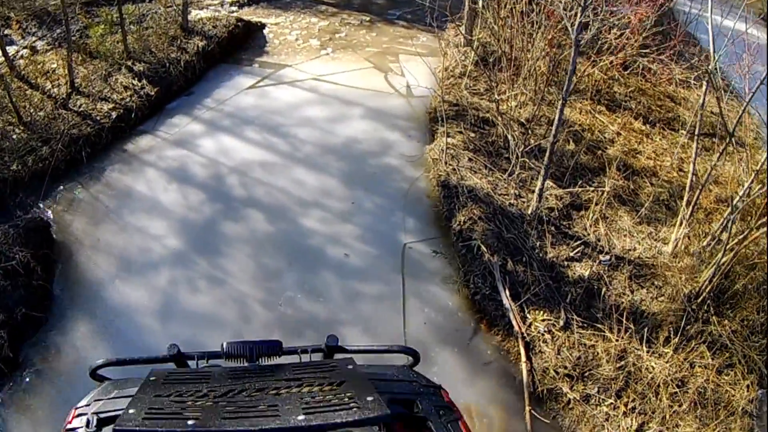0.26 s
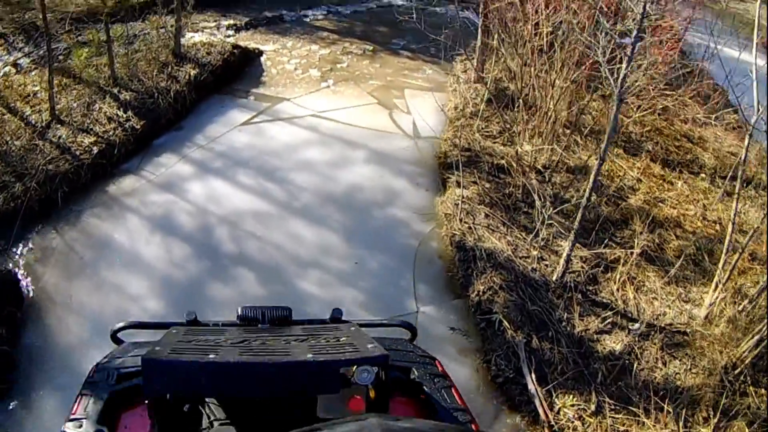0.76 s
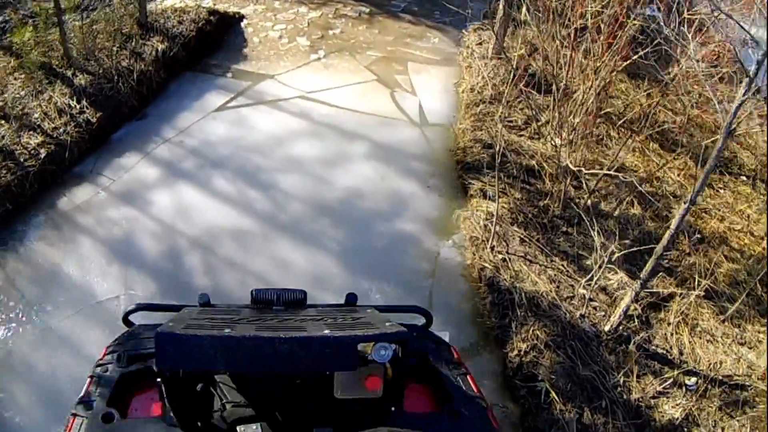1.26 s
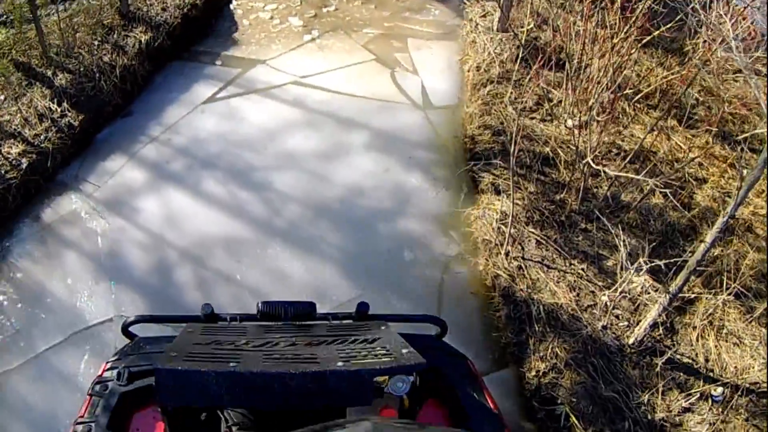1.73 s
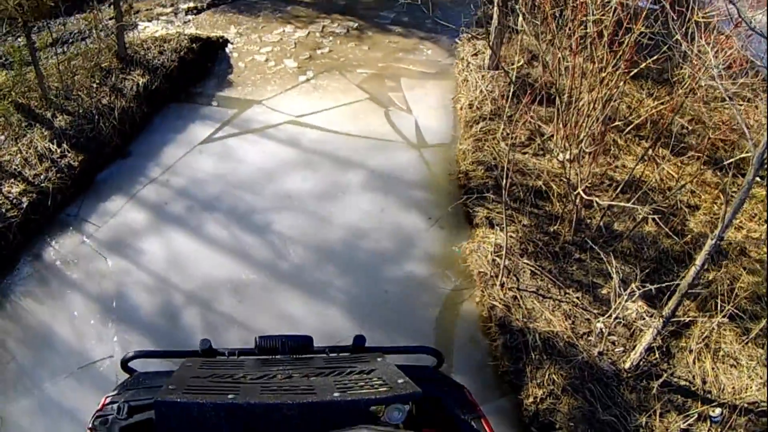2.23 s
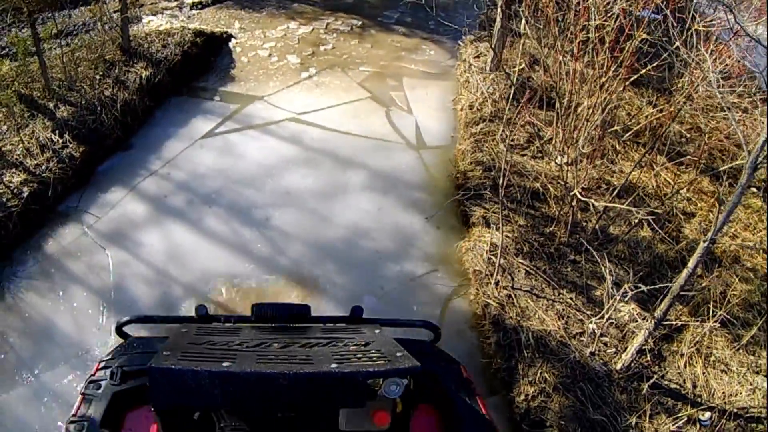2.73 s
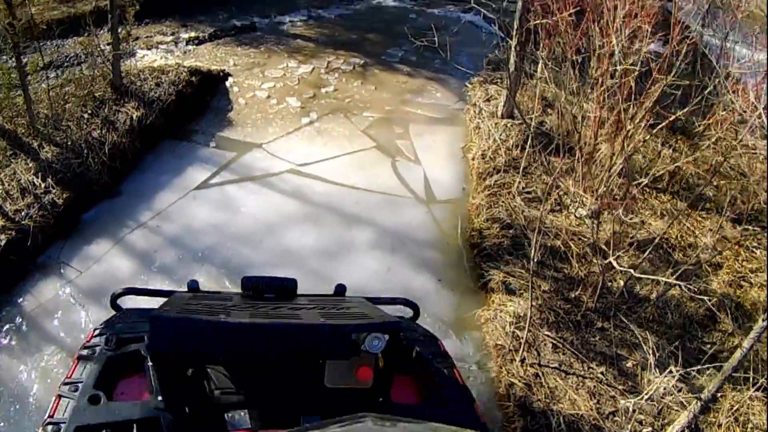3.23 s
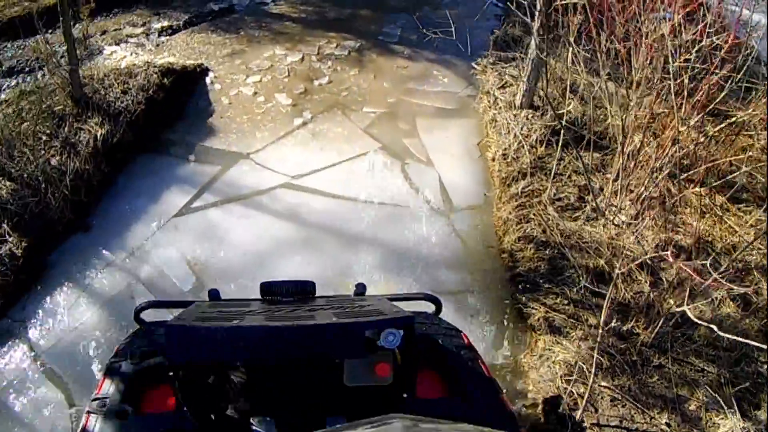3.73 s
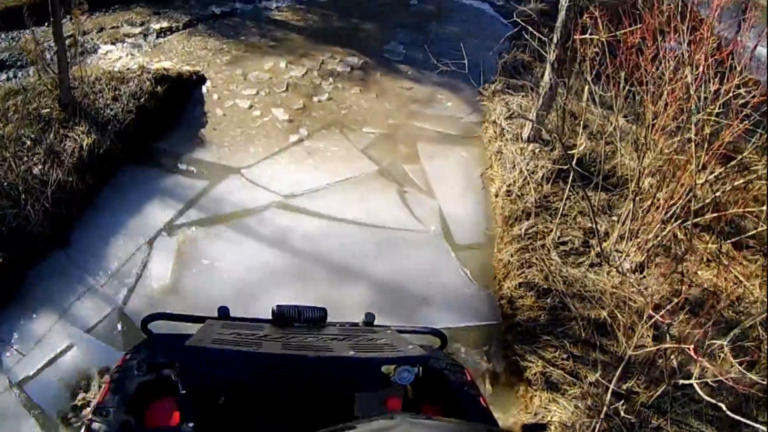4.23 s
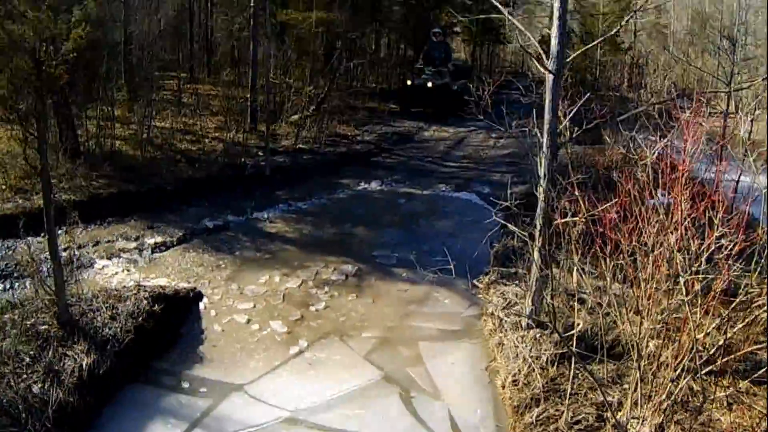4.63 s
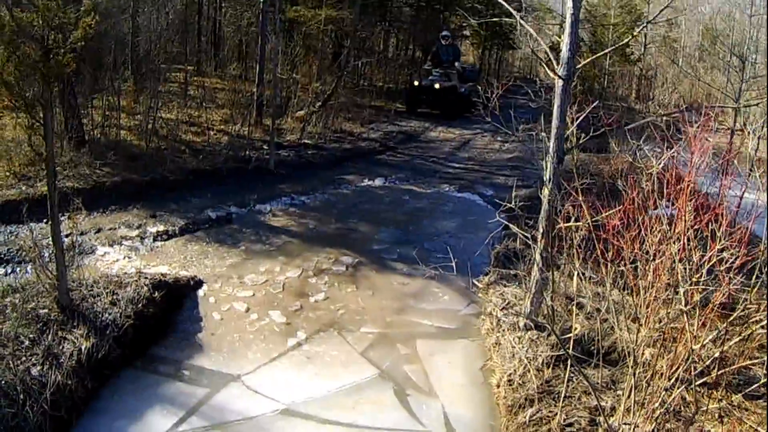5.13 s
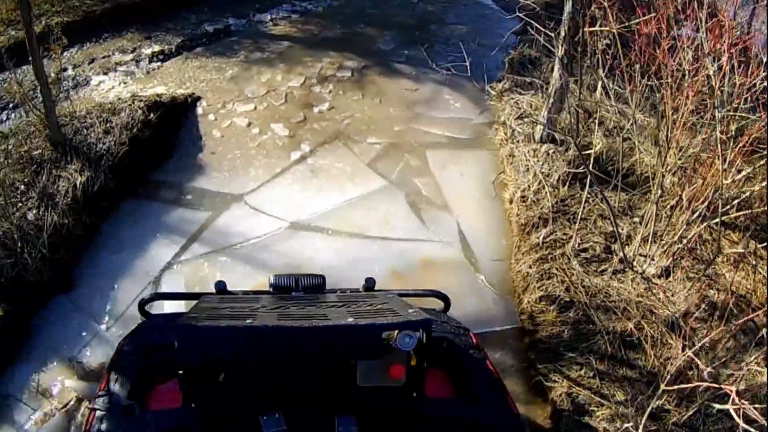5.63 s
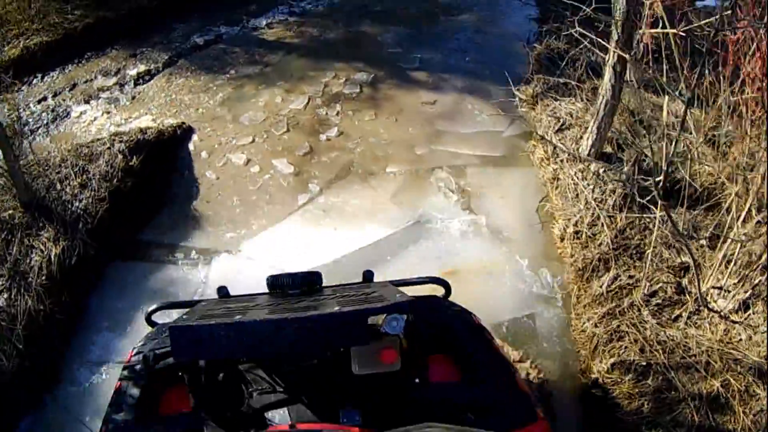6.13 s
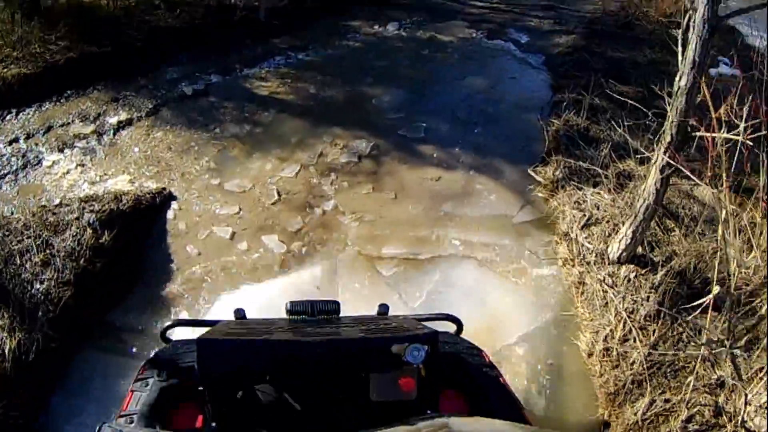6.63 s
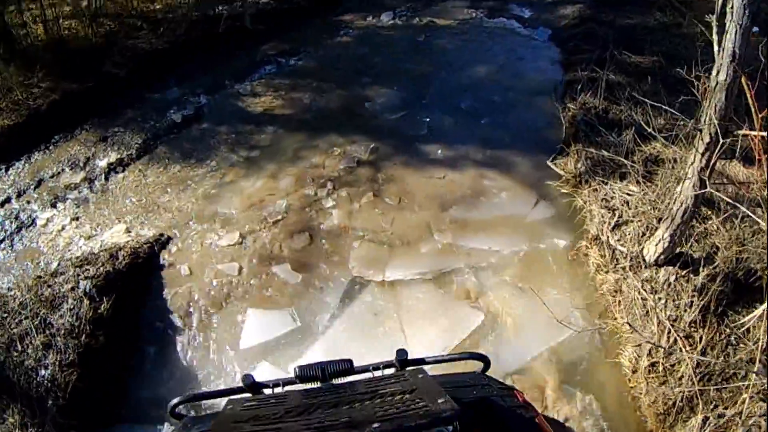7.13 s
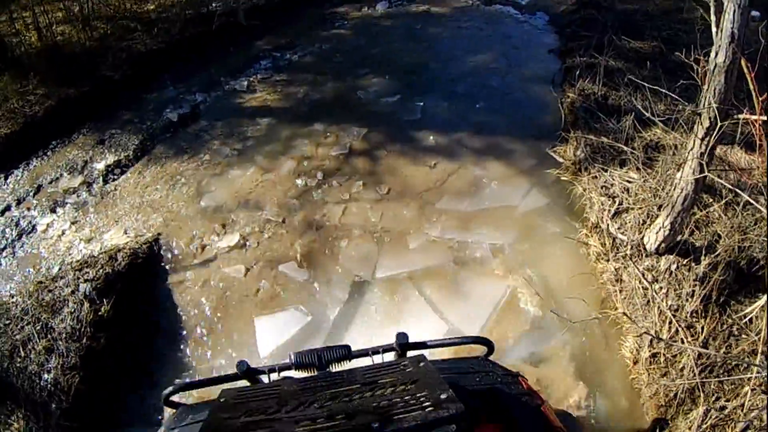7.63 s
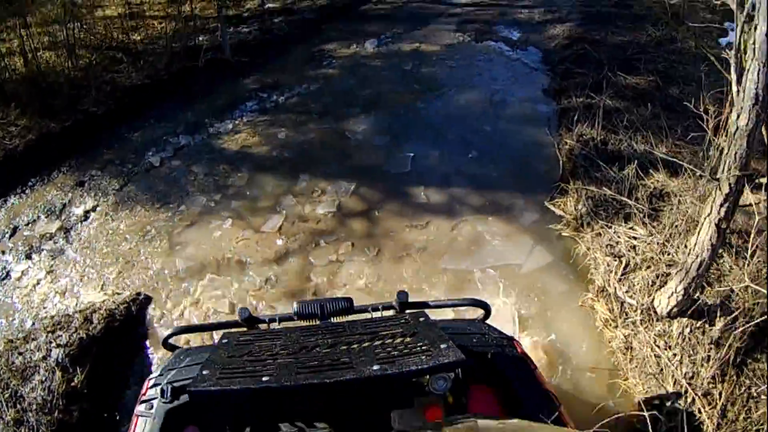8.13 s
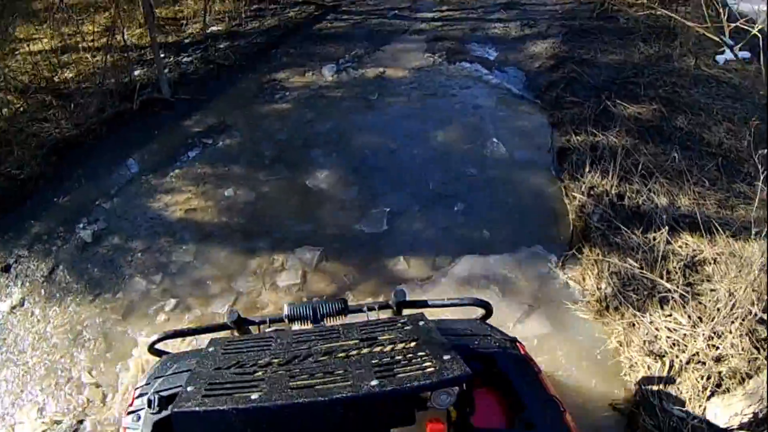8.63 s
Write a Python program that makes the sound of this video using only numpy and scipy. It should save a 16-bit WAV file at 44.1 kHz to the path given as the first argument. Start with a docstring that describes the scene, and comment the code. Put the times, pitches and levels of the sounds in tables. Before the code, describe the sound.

Muffled, close throttle surges from an all-terrain vehicle alternate with chugging idle, while its wheels slosh through water and break plates of ice.

```python
"""All-terrain vehicle on a flooded, frozen trail

A V-twin engine is heard from the rider's seat. Its firing and intake pulses excite resonators: with each
push of the throttle the exhaust drones and the airbox booms; between pushes it sinks to a lumpy idle.
The wheels churn water into spray and ringing bubbles, and break plates of ice. A closed camera housing
muffles all this above about 3 kHz; a faint hiss, thin squeaks and a slight tinkle lie on top."""
import sys
import numpy as np
from scipy import signal
from scipy.fft import rfft, irfft, next_fast_len
from scipy.io import wavfile
from scipy.ndimage import uniform_filter1d

SR = 44100
rng = np.random.default_rng(int(sys.argv[2]) if len(sys.argv) > 2 else 0)


def generate_wav(signal):
    """Clip the signal to [-1, 1] and save it as 16-bit WAV at the path in sys.argv[1]."""
    frames = np.transpose(np.atleast_2d(signal))
    scaled = np.clip(frames, -1, 1) * 32767
    pcm = np.round(scaled).astype(np.int16)
    wavfile.write(sys.argv[1], SR, pcm)


N = 391166
TIME = np.arange(N) / SR
IDLE_HZ = 11.82  # engine speed in cycles per second; one cycle is two turns of the crank
V_GAP = .385  # share of a cycle between the two cylinders' firings


def amp(db):
    """Decibels to amplitude ratio."""
    return 10 ** (np.asarray(db) / 20)

def unit(x):
    """Normalisation to rms 1."""
    return x / np.sqrt(np.mean(x ** 2) + 1e-20)

def steady(x, size=4200):
    """Normalisation by the running rms, which keeps the beat within each engine cycle."""
    return x / np.sqrt(abs(uniform_filter1d(uniform_filter1d(x ** 2, size), size)) + 1e-12)

def bell(value, centre, width):
    """Gaussian window: 1 at the centre, 1/e one width away."""
    return np.exp(-((value - centre) / width) ** 2)

def curve(points):
    """Linear interpolation of (time_s, value) points."""
    return np.interp(TIME, *np.transpose(points))

def wander(hz, step=16):
    """Random fluctuation: low-pass noise of rms 1."""
    n = next_fast_len(N // step + 2, True)
    f = np.fft.rfftfreq(n, step / SR)
    slow = irfft(rfft(rng.standard_normal(n)) * bell(f, 0, hz), n)
    return unit(np.interp(np.arange(N) / step, np.arange(n), slow))

def colour(x, points):
    """Spectral shaping by (frequency_hz, gain_db) points."""
    hz, db = np.transpose(points)
    n = next_fast_len(N, True)
    f = np.fft.rfftfreq(n, 1 / SR)
    return irfft(rfft(x, n) * amp(np.interp(np.log(f + 1), np.log(hz), db)), n)[:N]

def ring(x, modes):
    """Modal superposition: steep parallel resonators of alternating sign."""
    out = np.zeros(len(x))
    for k, (hz, width, db) in enumerate(modes):
        b, a = signal.iirpeak(hz, hz / width, SR)
        out += (-1) ** k * amp(db) * signal.lfilter(b, a, signal.lfilter(b, a, x))
    return out

def bent_ring(x, modes, stretch):
    """Time warping multiplies every modal frequency by the curve stretch."""
    clock = np.cumsum(stretch)
    ticks = np.arange(int(clock[-1]) + 1)
    return np.interp(clock, ticks, ring(np.interp(ticks, clock, x), modes))

def add(mix, start_s, peak_db, sound):
    """Superposition of one event at a given peak level."""
    part = mix[round(start_s * SR):][:len(sound)]
    part += (amp(peak_db) * sound / abs(sound).max())[:len(part)]

def strokes(cycles, lag, second_gain, uneven):
    """Impulse train: one click of random strength per cylinder and cycle, lag cycles after firing."""
    out = np.zeros(N)
    for offset, gain in ((lag, 1), (lag + V_GAP, second_gain)):
        at = np.flatnonzero(np.diff(np.floor(cycles - offset)) > 0)
        out[at] += gain * np.exp(uneven * rng.standard_normal(N))[at]
    return out

def puffs(clicks, decay_s):
    """Turbulence: an exponentially decaying noise burst after each click, at a running rms of 1."""
    envelope = signal.lfilter([1], [1, -np.exp(-1 / (decay_s * SR))], clicks)
    return steady(envelope * rng.standard_normal(N))

def scatter(x, decay_s, wet, count=40):
    """Early reflections from bodywork, water and banks."""
    delay_s = rng.uniform(.00099, .03, count)
    taps = np.zeros(SR // 10)
    taps[(delay_s * SR).astype(int)] = rng.choice([-1, 1], count) * np.exp(-delay_s / decay_s)
    return x + wet * signal.oaconvolve(x, taps / np.linalg.norm(taps))[:N]

def speed_gain(speed, base_db, doubling_db, drift_db):
    """Power law: the level moves from base_db by doubling_db per octave above idle, and drifts."""
    return amp(base_db + doubling_db * np.log2(speed / IDLE_HZ) + drift_db * wander(hz=8.3))


# Throttle pushes and the level each adds to the engine's parts:
# open_s, shut_s, drone_db, bark_db, hollow_db, rasp_db, clatter_db, overrun_db
THROTTLE_PUSHES = [(-0.4, 0.702, 8, -9, 8, 0, 2.5, -7), (2.163, 3.092, 8.5, -5.5, 5, 1.5, 12, 10),
                   (4.75, 5.975, 11.5, -1.5, 0.5, 5, 11.5, 7), (6.958, 8.086, 12.5, 1, 1.5, 6.5, 7.5, 5.5),
                   (7.89, 9.2, 15.5, 4, 5.5, 2.5, 7, 0)]

def throttle(open_s=.37, shut_s=.093, overrun_peak_s=.066, clatter_fade_s=.15):
    """Control envelopes: the throttle opens gently and snaps shut, and a swell of chug follows."""
    pushes = np.array(THROTTLE_PUSHES)
    since_open, since_shut = TIME - pushes[:, :1], TIME - pushes[:, 1:2]
    gates = np.clip(since_open / open_s, 0, 1) * np.clip(1 - since_shut / shut_s, 0, 1)
    gates /= np.maximum(gates.sum(0), 1)
    exhaust_db = pushes[:, 2:6].T @ gates
    clatter_db = pushes[:, 6] @ (gates * np.clip(-since_shut / clatter_fade_s, 0, 1) ** .5)
    after = np.maximum(since_shut, 0) / overrun_peak_s
    overrun_db = pushes[:, 7] @ (after * np.exp(1 - after))
    return gates.sum(0), exhaust_db, clatter_db, overrun_db

def pipe(cycles):
    """Pipe resonance reinforces harmonics 5 to 8 of both cylinders."""
    return sum(np.cos(2 * np.pi * order * (cycles - lag)) for order in range(5, 9) for lag in (0, V_GAP))


# Resonances of the silencer and pipe: pitch_hz, width_hz, gain_db
DRONE_MODES = [(114.4, 52.5, 0.5), (151.1, 36.6, -7), (389, 93, -22.5)]
BARK_MODES = [(187.4, 34, -6.5)]
TAILPIPE_MODES = [(247.5, 63, -11), (288.7, 23, -12.5)]
RASP_MODES = [(466, 69, 2), (614, 136, 3), (801.6, 50, 0), (970.6, 23, 4.5), (1130, 240, -12),
              (1290, 500, -14.5), (1554, 26, -2.5), (1980, 380, -32.5), (2360, 42, -31)]

def exhaust(cycles, speed, idle, load, opening, exhaust_db):
    """Source and filter: firing pulses ring the silencer, and the gas behind them rasps in the pipe."""
    drone_db, bark_db, hollow_db, rasp_db = exhaust_db
    firings = strokes(cycles, lag=0, second_gain=1.2, uneven=.07 + .17 * idle)
    pulses = steady(firings)
    roughness = .2 + .3 * idle + .35 * (1 - opening)
    gas = pulses + roughness * puffs(firings, decay_s=.01)
    heat = 1 + .0075 * np.maximum(speed - 28.3, 0)  # hot gas raises the resonances at high revs
    outrun_db = 1.83 * np.maximum(speed - 27.44, 0)  # the drone outruns the silencer and fades
    piped = gas + .051 * load * pipe(cycles)
    drone = steady(bent_ring(piped, DRONE_MODES, heat) + amp(bark_db) * ring(piped, BARK_MODES))
    drone *= speed_gain(speed, -47.5 + drone_db - outrun_db, doubling_db=2.38, drift_db=1)
    hollow = steady(ring(gas, TAILPIPE_MODES))
    hollow *= speed_gain(speed, -57 + hollow_db, doubling_db=2.5, drift_db=1.5)
    blast = scatter(pulses + (.1 + .8 * idle) * puffs(firings, decay_s=.014), decay_s=.011, wet=1.2)
    rasp = steady(bent_ring(blast, RASP_MODES, heat * (1 + .0089 * wander(hz=5))))
    rasp *= speed_gain(speed, -63 + rasp_db, doubling_db=8.9, drift_db=.86)
    return drone - hollow + rasp


# Resonances driven by the intake: pitch_hz, width_hz, gain_db
AIRBOX_MODES = [(44.6, 9.6, 5), (24, 6.2, -16.5)]
CHUG_MODES = [(89.4, 50, 9.5), (160, 55, -11.5), (211, 86, -18), (305.4, 78, -11)]
# Envelope of the airbox boom: time_s, level_db
BOOM_LEVELS = [(0.0, -27.5), (0.3, -33.5), (0.55, -40.5), (0.75, -36), (0.95, -46.5), (1.6, -51),
               (2.25, -43.5), (2.47, -33), (2.72, -32.5), (2.88, -39), (3.6, -46.5), (4.7, -46.5),
               (5.08, -36.5), (5.28, -43), (5.75, -35.5), (6.2, -35.5), (6.5, -45.5), (7.0, -43.5),
               (7.3, -33.5), (7.62, -30.5), (7.76, -36), (7.83, -30.5), (7.9, -47), (7.98, -28), (8.1, -41),
               (8.87, -33.5)]

def intake(cycles, speed, idle, opening, overrun_db):
    """Cavity resonance: each gulp of air before a firing sets the airbox booming and thumps the frame."""
    gulps = strokes(cycles, lag=.79, second_gain=.86, uneven=.054 + .26 * idle)
    boom = steady(ring(steady(gulps) + (.45 + .5 * idle) * puffs(gulps, decay_s=.041), AIRBOX_MODES))
    chug = steady(ring(steady(gulps) + .45 * puffs(gulps, decay_s=.008), CHUG_MODES))
    boom *= amp(curve(BOOM_LEVELS) + wander(hz=17))
    lug_db = -11.5 + 13 * bell(speed, centre=13, width=20)  # throttle smooths the chug, save at low revs
    chug *= speed_gain(speed, -43 + opening * lug_db + overrun_db, doubling_db=-.58, drift_db=1.2)
    return boom + chug


# Resonances of the gears in their casing, and of the panels: pitch_hz, width_hz, gain_db
GEAR_MODES = [(644, 88, 2.5), (855, 130, 0), (967, 61, -2.5), (1606, 130, -8.5), (1816, 120, -9.5)]
PANEL_MODES = [(1380, 150, -1.5), (1543, 150, 1.5), (1823, 150, -11), (2138, 110, -13.5), (2373, 50, -4),
               (2805, 64, -12.5)]

def bodywork(cycles, speed):
    """Forced vibration: each firing makes the gears thrash and the panels buzz; revs swell the buzz."""
    firings = strokes(cycles, lag=0, second_gain=1.1, uneven=.12)
    thrash = steady(ring(puffs(firings, decay_s=.016), GEAR_MODES))
    thrash *= amp(-60.5 + wander(hz=8.3))
    buzz = steady(ring(scatter(firings, decay_s=.012, wet=1.5), PANEL_MODES))
    buzz *= speed_gain(speed, -71, doubling_db=9.4, drift_db=1)
    return thrash + buzz


# Resonances of the engine casing: pitch_hz, width_hz, gain_db
CASING_MODES = [(1237, 43.7, 8), (1336, 55, -6), (2403, 47, -17)]
# Single hard knocks: start_s, peak_db
HARD_KNOCKS = [(0.678, -39), (0.724, -37.5), (2.358, -40.5), (2.432, -35), (4.236, -50), (4.363, -42.5),
               (4.454, -40.5), (4.891, -41), (7.233, -39.5), (7.3, -39.5)]

def casing(cycles, speed, clatter_db):
    """Impact excitation: every firing knocks the casing, which rings briefly; a few knocks stand out."""
    knocks = strokes(cycles, lag=.01, second_gain=1.1, uneven=.2)
    rattle = steady(knocks) + .35 * puffs(knocks, decay_s=.012)
    out = steady(bent_ring(rattle, CASING_MODES, 1 + .009 * wander(hz=9.5)))
    out *= speed_gain(speed, -63.5 + clatter_db, doubling_db=1.2, drift_db=.43)
    t = np.arange(SR // 8) / SR
    for start_s, peak_db in HARD_KNOCKS:
        blow = rng.standard_normal(len(t)) * np.exp(-t / .0011)
        add(out, start_s, peak_db, unit(ring(blow, CASING_MODES)) + 1.1 * unit(ring(blow, RASP_MODES)))
    return out


# Spectrum of the gas rumble: frequency_hz, gain_db
RUMBLE_SPECTRUM = [(8, -3), (18, 6.5), (30, 2.5), (65, -2.5), (95, -2.5), (160, -16), (300, -63.5)]

def rumble(cycles, speed, opening):
    """Flow noise and imbalance: gas rumbles under throttle; the crank shakes the frame once a turn."""
    gas = unit(colour(rng.standard_normal(N), RUMBLE_SPECTRUM)) * amp(-54.5 + 10.5 * opening)
    shake_db = -81 + 27.5 * np.log2(speed / IDLE_HZ)
    return gas + unit(np.sin(2 * np.pi * 2 * cycles)) * amp(shake_db)

def bubbles(per_s, spread_db, pitches=36):
    """Damped oscillators: bubbles and bits of slush ring as short rising chirps, a few of them loud."""
    out, t = np.zeros(N), np.arange(1500) / SR
    events = int(per_s * N / SR / pitches)
    for hz in np.geomspace(450, 2800, pitches):
        onsets = np.zeros(N)
        onsets[rng.integers(0, N, events)] = amp(spread_db * np.minimum(rng.exponential(1, events), 4))
        periods = hz * t
        chirp = np.sin(2 * np.pi * periods * (1 + .0032 * periods)) * np.exp(-periods / 7)
        out += hz * signal.oaconvolve(onsets, chirp)[:N]
    return unit(out)


# Spectrum of churned water: frequency_hz, gain_db
WATER_SPECTRUM = [(150, -27), (300, 2), (450, 1), (620, 1), (730, -9), (830, -0.5), (1100, -1.5),
                  (1400, -5.5), (1650, -2.5), (2000, -12.5), (2400, -15.5), (2850, -25.5), (3150, -25.5),
                  (4000, -68)]
# Base level of the churning water, swelling with the later throttle pushes: time_s, level_db
CHURN_LEVELS = [(0, -59), (1.05, -58), (1.4, -57), (1.8, -59), (2.3, -56), (2.7, -51.5), (3.4, -56.5),
                (3.8, -57.5), (4.3, -57), (4.8, -56), (5.3, -51.5), (5.9, -54.5), (6.3, -56.5), (6.7, -57),
                (7, -57.5), (7.5, -53.5), (8.87, -58)]

def water(speed, lag_s=.45, doubling_db=8, slosh_db=1.27):
    """Relaxation: the wheels churn up spray and bubbles, whose level lags behind the engine speed."""
    spray = unit(colour(rng.standard_normal(N), WATER_SPECTRUM))
    froth = unit(colour(bubbles(per_s=1000, spread_db=3.5), WATER_SPECTRUM))
    octaves = np.log2(speed / IDLE_HZ)
    pole = np.exp(-1 / (lag_s * SR))
    stirred = octaves[0] + signal.lfilter([1 - pole], [1, -pole], octaves - octaves[0])
    level_db = curve(CHURN_LEVELS) + doubling_db * stirred + slosh_db * wander(hz=21.9)
    return unit(spray + .55 * froth) * amp(level_db)


# Spectrum of the hiss: frequency_hz, gain_db
HISS_SPECTRUM = [(2000, -41), (3200, 0.5), (3700, 2.5), (5500, -1), (9000, 2), (12000, 1.5), (14000, 3.5)]
# Its brief flares: centre_s, boost_db
HISS_FLARES = [(.39, 1), (2.72, 1), (3.17, 3), (5.37, 3), (5.45, 3), (5.81, 3), (7.53, 3.5), (7.61, 2),
               (7.69, 3), (7.85, 3), (7.99, 2.5)]

def hiss(sound):
    """Amplitude modulation: a faint grainy hiss follows the sound's envelope, above a constant floor."""
    envelope = np.sqrt(abs(uniform_filter1d(sound ** 2, size=1500)))
    grain = rng.standard_normal(N) * amp(2.4 * wander(hz=302) + .7 * wander(hz=8.9))
    flare_db = sum(db * bell(TIME, centre_s, width=.03) for centre_s, db in HISS_FLARES)
    return unit(colour(grain, HISS_SPECTRUM)) * (amp(-86.5) + amp(-42 + flare_db) * envelope)


# Overtones of the engine cycle that sing out: centre_s, half_length_s, harmonic, level_db
HOWL_SWELLS = [(0.194, 0.27, 11, -46), (0.284, 0.089, 35, -53.5), (0.298, 0.21, 21, -54),
               (0.595, 0.2, 16, -56.5), (0.598, 0.14, 19, -60), (0.693, 0.057, 52, -58),
               (2.664, 0.11, 11, -46.5), (2.668, 0.1, 27, -48.5), (2.807, 0.13, 24, -57),
               (2.94, 0.11, 19, -53), (2.827, 0.066, 45, -58), (2.93, 0.062, 42, -52.5),
               (2.95, 0.074, 18, -62), (3.06, 0.077, 21, -58), (5.438, 0.31, 21, -50.5),
               (5.5, 0.33, 34, -59.5), (5.496, 0.068, 24, -55), (5.652, 0.079, 27, -72),
               (5.7, 0.12, 26, -48.5), (5.756, 0.044, 39, -51), (5.93, 0.084, 21, -46.5),
               (5.455, 0.085, 52, -49.5), (5.642, 0.079, 50, -54), (7.63, 0.12, 40, -57),
               (7.695, 0.19, 32, -71), (7.806, 0.11, 61, -59), (8.0, .15, 37, -59),
               (8.06, 0.063, 50, -53.5), (7.584, 0.12, 27, -50), (7.597, 0.078, 21, -52),
               (7.633, 0.059, 26, -47), (7.88, 0.16, 26, -52), (8.044, 0.21, 24, -58),
               (8.055, 0.39, 18, -49.5), (8.082, 0.098, 21, -50), (8.125, 0.22, 8, -44),
               (8.284, 0.39, 34, -55.5), (8.29, 0.22, 16, -48.5), (8.472, 0.1, 21, -50),
               (8.657, 0.078, 14, -47), (8.68, 0.23, 24, -48), (8.72, .22, 22, -53), (8.7, .2, 27, -53.5),
               (8.62, 0.17, 32, -53.5), (8.835, 0.074, 32, -49), (8.336, .15, 39, -52.5),
               (8.414, 0.34, 29, -54.5), (8.78, 0.13, 23, -55), (8.81, 0.11, 37, -61),
               (8.856, 0.051, 16, -46)]

def howls(cycles, throb=.6, rough=.25):
    """Resonance: at the listed times a harmonic swells, as on meeting a mode of pipe or bodywork."""
    out = np.zeros(N)
    shaken = cycles + .0018 * wander(hz=45)  # uneven combustion jitters the phase
    for centre_s, half_s, harmonic, db in HOWL_SWELLS:
        on = abs(TIME - centre_s) < 2 * half_s
        tone = np.sin(2 * np.pi * (harmonic * shaken[on] + rng.random()))
        out[on] += amp(db) * bell(TIME[on], centre_s, half_s) * tone
    modulation = 1 + throb * np.cos(2 * np.pi * (cycles - V_GAP)) + rough * wander(hz=91)
    return np.sqrt(2) * out * modulation

def lull(cycles, idle):
    """Decay between pulses: the gain dips in the long wait between firings, deeper at low revs."""
    depth_db = -10 * (.1 + .9 * idle) * (1 + .35 * wander(hz=8))
    return amp(depth_db * bell((cycles - .26) % 1, centre=.49, width=.11))  # 3/4 through the cycle


# Faint squeaks: centre_s, peak_db
SQUEAK_EVENTS = [(.7, -64), (1.18, -70), (1.5, -66), (1.8, -62), (2.15, -69), (2.46, -62), (2.94, -65),
                 (3.44, -66), (3.9, -67), (4.46, -72), (4.73, -70)]
# Their resonances: pitch_hz, width_hz, gain_db
SQUEAK_MODES = [(11850, 200, -11), (13200, 300, 2), (14500, 450, 0)]

def squeaks(half_length_s=.011):
    """Narrow-band noise: brief bursts make thin squeaks far above the engine's range."""
    out, t = np.zeros(N), np.arange(SR // 10) / SR
    middle_s = t.mean()
    for centre_s, peak_db in SQUEAK_EVENTS:
        burst = rng.standard_normal(len(t)) * bell(t, middle_s, half_length_s)
        add(out, centre_s - middle_s, peak_db, ring(burst, SQUEAK_MODES))
    return out


# Ice plates breaking and knocking on the wheels: start_s, level_db, pitch_hz, crumb_share
ICE_BREAKS = [(1.154, -32, 1124, 0.78), (1.188, -37, 1100, .8), (1.486, -42, 1080, .7),
              (2.033, -48, 1200, .4), (3.102, -42, 860, .4), (3.17, -37, 830, .5), (3.242, -36, 1185, 0.26),
              (3.353, -39, 1010, 0.55), (3.495, -41, 860, .4), (3.534, -37, 1010, .4),
              (4.173, -43.5, 1140, 0.61), (5.774, -36, 1140, .8), (6.262, -37, 815, .25),
              (6.344, -42, 1030, 0.23), (6.4, -36.5, 820, 0.82), (6.59, -39, 1020, 0.26),
              (6.687, -42, 1050, .5), (8.349, -32.5, 1124, 0.51)]
# Resonances of a plate: pitch_ratio, width_hz, gain_db
PLATE_MODES = [(1, 170, 3), (1.48, 190, -4.5), (1.9, 218, -4.5)]

def ice(run_s=.0061, stop_s=.01, crumb_t60_s=.35, snaps_per_s=1200):
    """Brittle fracture: a crack runs in quick snaps that ring the plate, then the crumbs die away."""
    out, t = np.zeros(N), np.arange(SR // 3) / SR
    hardest_db = max(db for _, db, _, _ in ICE_BREAKS)
    for start_s, db, hz, crumbs in ICE_BREAKS:
        treble_db = -10.5 - 4.5 * (hardest_db - db)  # softer breaks are duller
        snaps = rng.standard_normal(len(t)) * (.6 + 3 * (rng.random(len(t)) < snaps_per_s / SR))
        snaps *= np.exp(-np.maximum(t - run_s, 0) / stop_s) + crumbs * amp(-60 * t / crumb_t60_s)
        crack = ring(snaps, [(hz, 1100, 0), (1900, 900, treble_db)])
        plate = ring(snaps, [(hz * ratio, width, gain_db) for ratio, width, gain_db in PLATE_MODES])
        add(out, start_s, db, crack + plate)
    return signal.sosfilt(signal.butter(4, 2400, fs=SR, output="sos"), out)


# Engine speed: time_s, cycle_rate_hz
ENGINE_SPEED = [(0.0, 20.57), (0.2, 22.54), (0.5, 24.03), (0.75, 23.8), (1.0, 18.02), (1.15, 13.76),
                (1.3, 10.87), (1.75, 10.2), (2.2, 10.55), (2.38, 12.25), (2.6, 22.03), (2.88, 28.71),
                (3.08, 28.33), (3.35, 19.72), (3.8, 11.76), (4.0, 10.57), (4.3, 10.3), (4.78, 10.61),
                (5.0, 13.69), (5.2, 21.16), (5.4, 23.3), (5.82, 25.35), (6.0, 27.13), (6.12, 22.97),
                (6.4, 15.79), (6.62, 13.69), (6.9, 9.5), (7.08, 10.69), (7.25, 14.38), (7.45, 20.75),
                (7.62, 23.95), (8.0, 26.33), (8.43, 30.5), (8.87, 34.7)]

def scene():
    """Superposition: the engine's parts, locked to one crank phase, add to the water and the ice."""
    speed = curve(ENGINE_SPEED)
    opening, exhaust_db, clatter_db, overrun_db = throttle()
    idle = np.clip((21 - speed) / 10, 0, 1)  # a slow engine fires less evenly
    cycles = np.cumsum(speed * (1 + (.002 + .005 * idle) * wander(hz=26))) / SR
    acceleration = uniform_filter1d(np.gradient(speed, TIME), size=8000)
    load = opening * (1 - idle) ** 2 / (1 + (acceleration / 30) ** 2)  # the wheels hold the engine back
    engine = exhaust(cycles, speed, idle, load, opening, exhaust_db) + howls(cycles)
    engine += bodywork(cycles, speed)
    engine += intake(cycles, speed, idle, opening, overrun_db)
    engine += casing(cycles, speed, clatter_db)
    engine *= lull(cycles, idle)
    return (engine + rumble(cycles, speed, opening) + water(speed) + ice())[None]


# Peaks and dips of the camera housing: pitch_hz, width_hz, gain_db
HOUSING_MODES = [(816, 63, 1.5), (1576, 110, -0.5), (1710, 59, -8.5), (2315, 95, -8), (2396, 42, 1.5),
                 (2645, 150, -4.5), (2785, 120, 0)]

def housing(x):
    """Enclosure resonance: the closed case colours the sound with narrow peaks and dips."""
    for hz, width, db in HOUSING_MODES:
        x = x + (amp(db) - 1) * signal.lfilter(*signal.iirpeak(hz, hz / width, SR), x)
    return x


# A faint tinkling ring near 3.7 kHz, heard mostly on the ice cracks: pitch_hz, width_hz, gain_db
TINKLE_MODES = [(3700, 390, 5)]

def record(dry, muffle_hz=2900, edge_hz=14700):
    """Low-pass filtering: the housing muffles the treble. A tinkle, hiss and squeaks lie on top."""
    coloured = housing(dry[0])
    wall = signal.cheby1(12, .3, muffle_hz, fs=SR, output="sos")
    sound = signal.sosfilt(wall, coloured) + ring(coloured, TINKLE_MODES)
    band_edge = signal.ellip(10, .1, 80, edge_hz, fs=SR, output="sos")
    return signal.sosfilt(band_edge, sound + hiss(sound) + squeaks())[None]


dry = scene()
out = record(dry)
generate_wav(out)
```